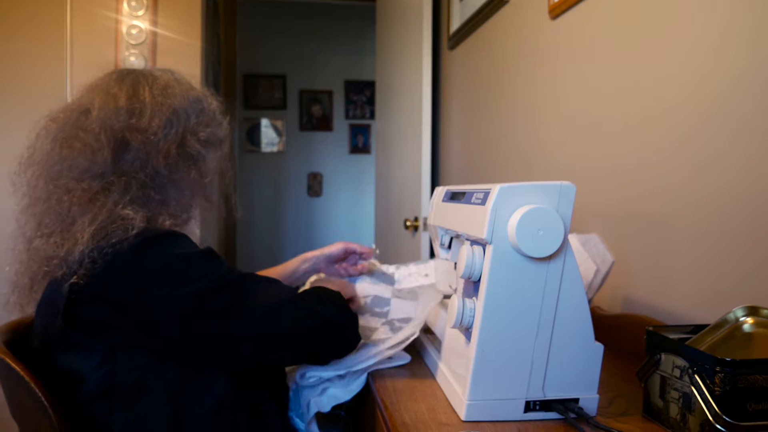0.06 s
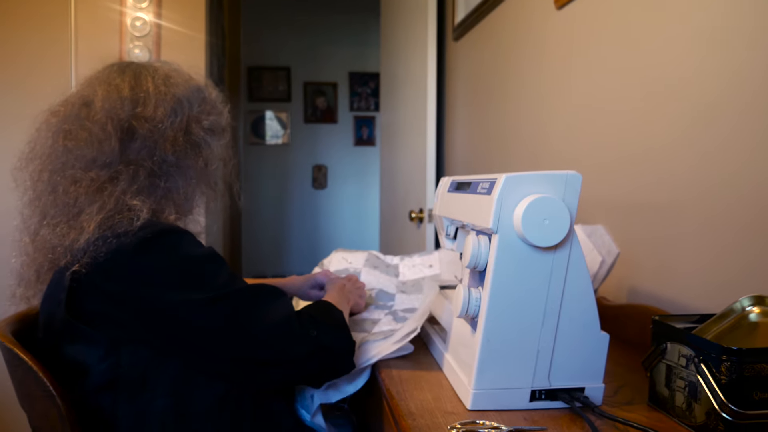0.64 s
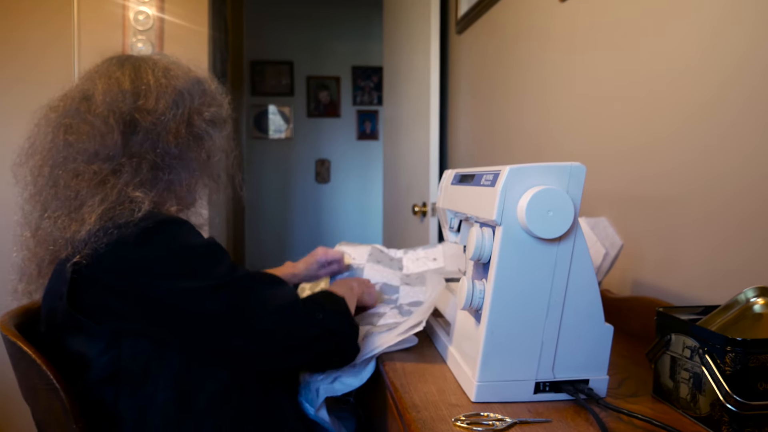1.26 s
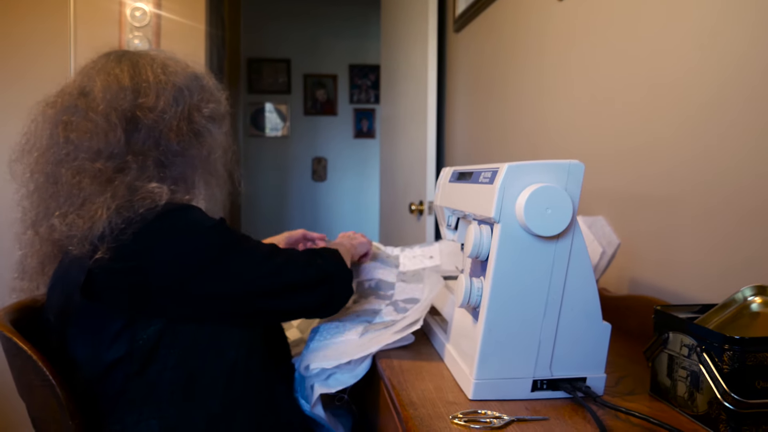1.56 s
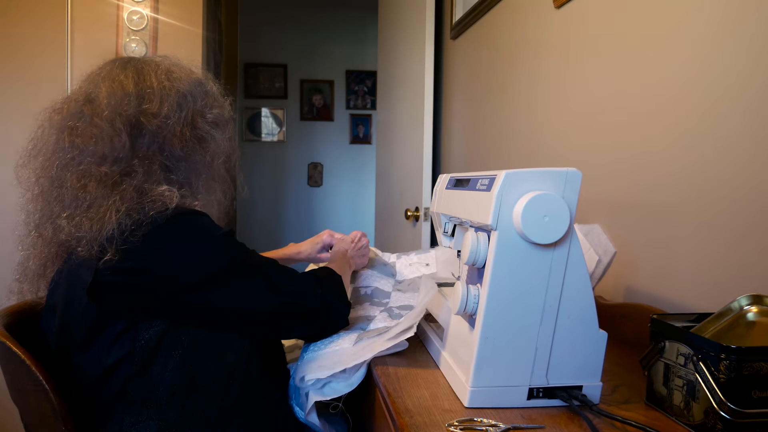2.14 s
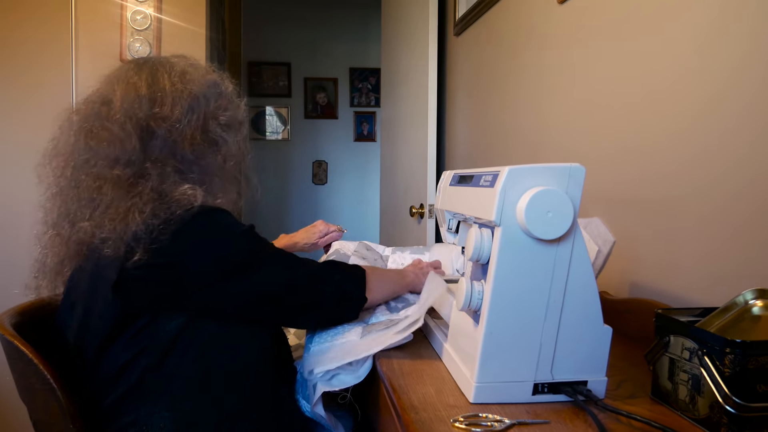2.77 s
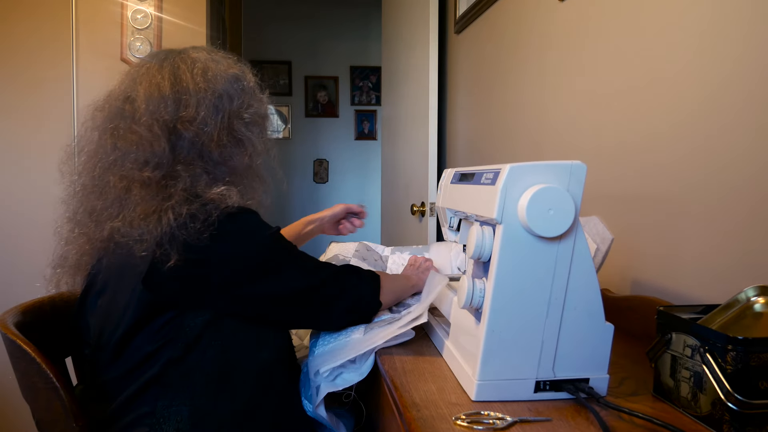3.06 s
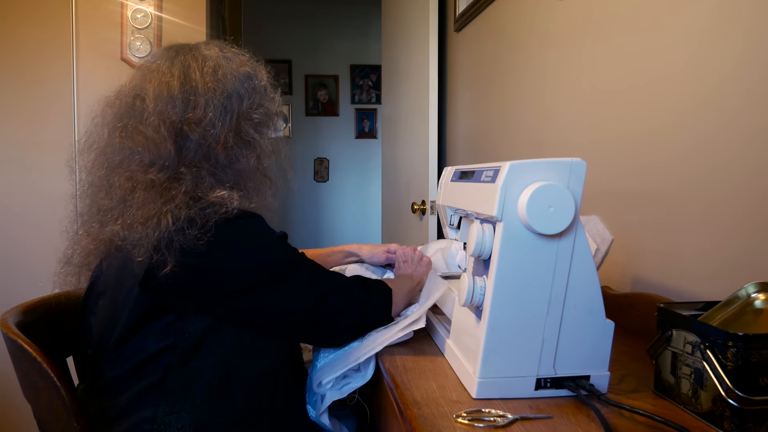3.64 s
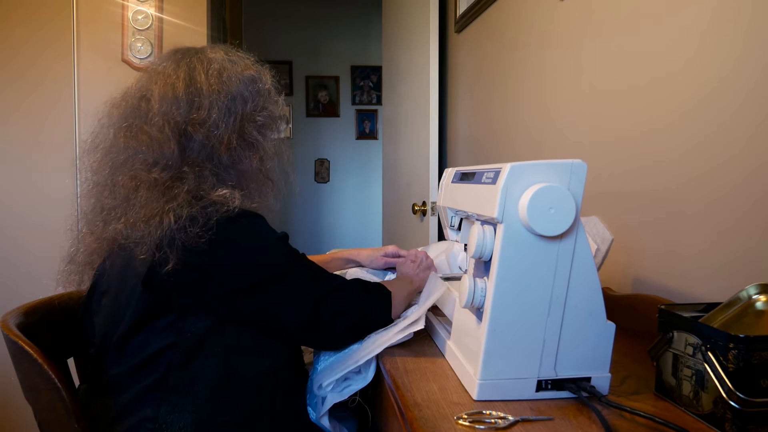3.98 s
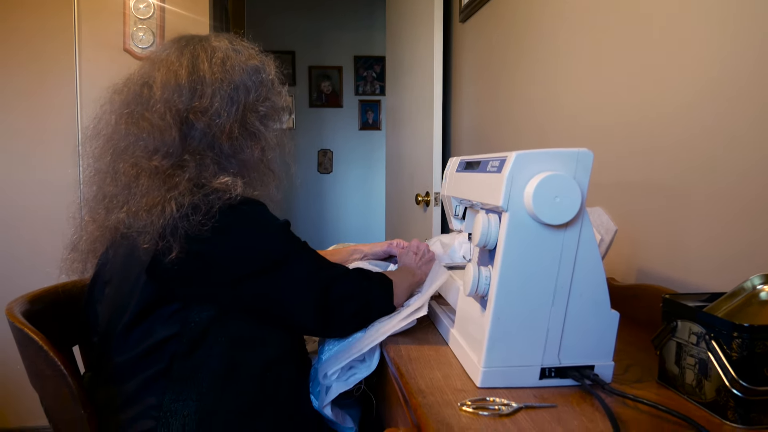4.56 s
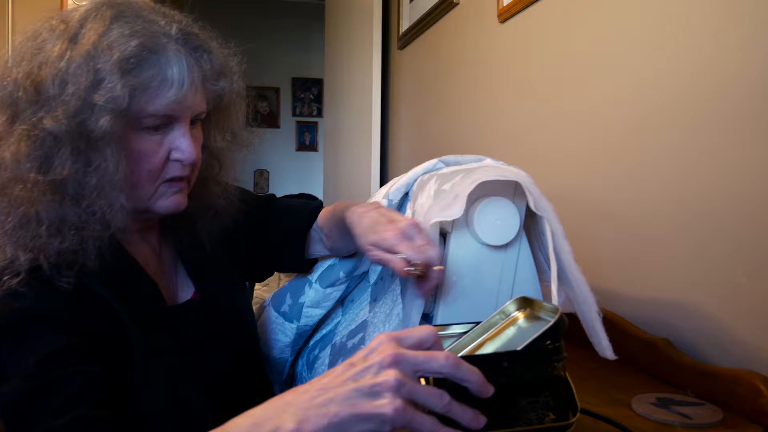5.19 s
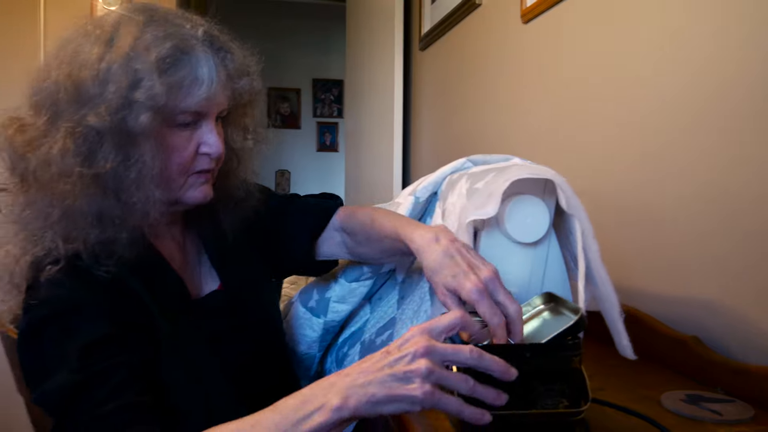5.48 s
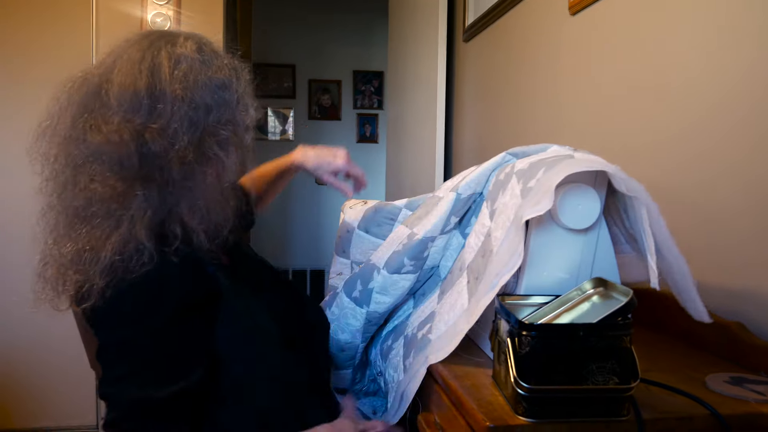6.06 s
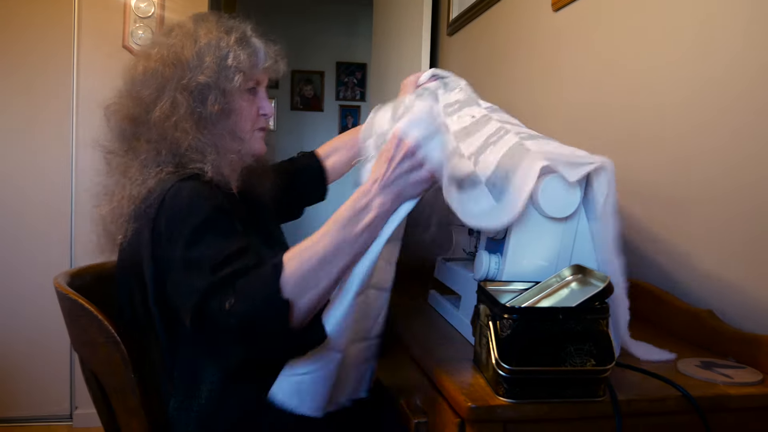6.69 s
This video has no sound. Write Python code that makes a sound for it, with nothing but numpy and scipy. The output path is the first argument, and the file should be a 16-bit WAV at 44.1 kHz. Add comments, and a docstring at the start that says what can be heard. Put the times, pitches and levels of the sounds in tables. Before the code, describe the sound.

In a small, quiet room, nearby hands smooth fabric with faint rubbing, while arms bump a wooden table, furniture creaks and small hard things tick. After about five seconds a tin lid rattles, followed by a loud, ringing clatter as the tin and its contents are pushed along. Last comes a swish of heavy cloth with soft slaps, low thumps and more creaks, all over a faint rumble and hiss.

```python
"""Soft rubbing, a creak and dull thuds: a quilt is handled at a sewing machine in a small, quiet room.
The cloth rustles as its threads stick and slip, arms set the wooden table booming, furniture joints
creak and small hard things click close by. A lid chatters, then a sewing tin is shoved aside with a
loud clatter of contents against ringing steel walls. Last, the quilt is swept up over the machine,
flapping the air and drumming on the table. A low rumble and a faint hiss lie under it all."""
import sys
import numpy as np
from scipy import signal
from scipy.fft import rfft, irfft, next_fast_len
from scipy.io import wavfile
from scipy.ndimage import uniform_filter1d

SR = 44100
rng = np.random.default_rng(int(sys.argv[2]) if len(sys.argv) > 2 else 0)


def transcribe(u):
    """Save the signal u as a 16-bit wav file named by the first command-line argument.

    u: samples, shape (n,) or (channels, n), limited to [-1, 1]; the rate is SR.
    q: integer samples, one column per channel.
    """
    v = np.clip(np.atleast_2d(u).T, -1, 1)
    q = np.round(v * 32767).astype(np.int16)
    wavfile.write(sys.argv[1], SR, q)


N = 305275
TIME = np.arange(N) / SR
AGE = TIME[:SR * 2 // 3]  # seconds since the start of one short event
STROKE_PEAK = 0.37  # share of a stroke at which hand or arm is fastest

# Spectrum of cloth friction. Each row: frequency in Hz, gain in dB.
CLOTH_SPECTRUM = [(530, -4.5), (1020, -6), (1470, -9.5), (1880, -11.5), (3430, -15), (9530, -22),
                  (16000, -34.5)]
# Spectrum of the rattling tin. Each row: frequency in Hz, gain in dB.
TIN_SPECTRUM = [(88, -26), (150, 0.5), (209, -8.5), (321, -7), (439, -3), (504, 1.5), (612, -7), (923, -4),
                (1420, -5.5), (1560, -5.5), (1760, -11), (1940, -7), (2980, -10.5), (6260, -9),
                (16000, -25.5)]
# The tin's base bumping on the table. Each row: start in seconds, relative level in dB.
TIN_BUMPS = [(5.354, -27.5), (5.399, -29), (5.542, -20)]


def cloth(resting_db=-77, flap_db=-2, drum_db=-6, tick_db=-21):
    """Stick-slip friction: threads rustle with speed; the swung quilt flaps air and drums the table."""
    # A hand smooths the cloth. Each row: start and length in seconds, level in dB.
    strokes = [(0.278, 0.52, -83), (1.244, 0.15, -73.5), (1.43, 0.36, -73.5), (2.528, 0.96, -71),
               (3.274, 0.39, -73), (3.58, 0.26, -79.5), (4.136, 0.21, -76.5), (4.758, 0.037, -64),
               (4.9, 0.16, -75)]
    # The quilt is swung up. Each row: start and length in seconds, sliding and air drive in dB.
    swings = [(5.932, 0.62, -57, -50), (6.394, 0.4, -56.5, -43.5), (6.653, 0.38, -62, -56)]
    # Spectra of nails ticking over seams and of flapped air. Each row: frequency in Hz, gain in dB.
    nail_spectrum = [(400, 10), (1500, -36), (6000, -1), (15000, 7)]
    flap_spectrum = [(120, -25), (200, 9.5), (323, -7.5), (542, -9), (1000, -28), (2200, -82)]
    stroking = sum(undb(db) * gesture(s, length, STROKE_PEAK, power=0.74) for s, length, db in strokes)
    hands = undb(resting_db) + stroking  # cloth stirs even under resting hands
    speed, air = hands, 0
    for s, length, slide_db, air_db in swings:
        swing = gesture(s, length, peak=0.42, power=1.43)
        speed = speed + undb(slide_db) * swing
        air = air + undb(air_db) * swing
    folds = undb(3.3 * walk(rate=50))  # moving folds make the level uneven
    slips = unit(colour(grains(N, rate=9000, spread_db=0), CLOTH_SPECTRUM)) * speed
    ticks = unit(colour(grains(N, rate=30, spread_db=-9), nail_spectrum)) * hands * undb(tick_db)
    flaps = unit(colour(rng.standard_normal(N), flap_spectrum)) * air * undb(flap_db)
    patter = grains(N, rate=370, spread_db=3.5)
    drumming = unit(signal.fftconvolve(patter, table_blow())[:N]) * air * undb(drum_db)
    return in_room(folds * (slips + flaps) + ticks, wet_db=-15, treble_db=3) + drumming


def crinkles(broadband_db=-10):
    """Buckling: a fold gives way in a run of sharp catches; the tighter the fold, the higher it sounds."""
    # Each row: start and length in seconds, level in dB, pitch in Hz.
    folds = [(1.268, 0.036, -61, 2100), (2.851, 0.047, -61, 2500), (3.018, 0.042, -59.5, 2280),
             (3.612, 0.027, -61, 3700), (6.061, 0.028, -48, 4430), (6.096, 0.024, -47, 2580),
             (6.271, 0.056, -51, 2280), (6.338, 0.016, -52.5, 2200), (6.609, 0.036, -47.5, 2460),
             (6.884, 0.017, -50, 4080)]
    out = np.zeros(N)
    for s, length, db, hz in folds:
        catches = colour(grains(len(AGE), rate=1800, spread_db=2), CLOTH_SPECTRUM)
        pitched = resonate(catches, hz, q=1.6) + undb(broadband_db) * catches
        envelope = np.interp(AGE, [0, 0.25 * length, length], [0, 1, 0])
        add(out, s, peak_at(envelope * pitched, db), lag_s=0)
    return in_room(out, wet_db=-3.5, treble_db=2)


def slaps(dull_hz=900):
    """Air displacement: a loose edge of the quilt slaps down and squeezes out a short, hollow puff."""
    # Each row: start in seconds, level in dB, pitch in Hz.
    landings = [(6.51, -51, 606), (6.574, -42, 400), (6.591, -46, 460), (6.614, -38, 554),
                (6.641, -48.5, 520), (6.689, -44, 322)]
    out = np.zeros(N)
    for s, db, hz in landings:
        puff = rng.standard_normal(len(AGE)) * swell(rise_s=0.0017) * fade(t60=0.057)
        hollow = cut(resonate(puff, hz, q=6.2), dull_hz, "low", order=4)
        add(out, s, peak_at(hollow, db), lag_s=0)
    return in_room(out, wet_db=-18, treble_db=6)


def tin(wall_t60=0.26, scrape_db=-0.5):
    """Impact excitation: knocks rattle the contents and ring walls and cavity; the base bumps on wood."""
    # Tin, lid and contents collide. Each row: start in seconds, relative levels of body, edge and
    # ring in dB, pitch of the struck spot in Hz.
    collisions = [(5.353, -22, -44, -42, 680), (5.362, -28, -38, -39, 1490), (5.403, -22, -33, -52, 1000),
                  (5.46, -19, -30, -38, 1240), (5.488, -27, -53, -50, 1210),
                  (5.512, -19.5, -21.5, -25.5, 1070), (5.547, -35, -31.5, -30, 2670),
                  (5.563, -25, -29, -29, 1580), (5.574, -28, -24, -29.5, 4100),
                  (5.595, -35, -28, -40, 4100), (5.662, -27, -25.5, -38, 1970),
                  (5.706, -37, -29.5, -37.5, 920), (5.741, -30.5, -26.5, -46, 3460),
                  (5.784, -37, -34.5, -38.5, 2080), (5.796, -39, -34.5, -38, 1140),
                  (5.866, -40.5, -44.5, -56, 6460), (5.917, -40.5, -40.5, -50, 1320)]
    # Modes of the thin steel walls. Each row: frequency in Hz, relative level in dB.
    wall_modes = [(921, -51), (1052, -52), (1110, -51), (1206, -51), (1497, -51), (1567, -51), (1886, -54),
                  (1960, -55), (2030, -53), (2606, -55), (3031, -55), (3359, -56), (4129, -54), (4920, -57),
                  (5507, -56), (5835, -55), (6460, -54), (7854, -57)]
    # Modes of the cavity and of the base. Each row: frequency in Hz, relative level in dB, T60 in seconds.
    cavity_modes = [(503.5, -1, 0.24), (549, -9, 0.14)]
    base_modes = [(276, 2, 0.093), (321.6, 8.5, 0.095), (357, -23, 0.054), (527, -2, 0.17)]
    walls = [(hz, db, wall_t60) for hz, db in wall_modes]
    out = scrape(walls) * undb(scrape_db)
    for s, body_db, edge_db, ring_db, hz in collisions:
        envelope = 0.8 * fade(t60=0.012) + fade(t60=0.12)  # a crack, then the longer rattle
        rattle = grains(len(AGE), rate=5800, spread_db=0.5) * envelope
        rattle = colour(rattle + undb(1) * resonate(rattle, hz, q=5), TIN_SPECTRUM)
        steel = peak_at(ring(walls, scatter_db=3, detune=0.001), 0)
        cavity = ring(cavity_modes, scatter_db=1.5, detune=0.015)
        knock = contact(rattle, body_db - 4, edge_db - 1, body_hz=2180, edge_hz=1900)
        add(out, s, knock + undb(ring_db - 2) * (steel + cavity))
    for s, db in TIN_BUMPS:
        base = soften(ring(base_modes, scatter_db=2, detune=0.005), push_s=0.00027)
        add(out, s, peak_at(cut(base, 170, "high"), db))
    return in_room(out, wet_db=-10.5, treble_db=4.5)


def scrape(walls, start_s=5.345, length_s=0.56, steel_db=-10, split_hz=2450):
    """Forced vibration: the shoved tin judders, its contents slide later, and both drive the walls."""
    jostle = grains(N, rate=2200, spread_db=1.5)
    steel = signal.fftconvolve(jostle, ring(walls, scatter_db=1.5, detune=0))[:N]
    sound = unit(colour(jostle, TIN_SPECTRUM)) + undb(steel_db) * unit(steel)
    judder = unit(cut(sound, split_hz, "low", order=4))
    contents = unit(cut(sound, split_hz, "high", order=4))
    early = undb(-34.5) * gesture(start_s, length_s, peak=0.097, power=1.35)
    late = undb(-39.5) * gesture(start_s, length_s, peak=0.64, power=1.26)
    return early * judder + late * contents


def lid(plate_db=-1, rim_db=-3, mode_t60=0.031):
    """Plate vibration: the loose lid chatters on the tin's rim at each rebound and rings briefly."""
    # Each row: start in seconds, relative level in dB, T60 of the chatter in seconds.
    rebounds = [(4.963, -53, 0.22), (5.041, -40.5, 0.1), (5.051, -39.5, 0.086), (5.066, -46, 0.076),
                (5.09, -46, 0.084), (5.127, -52.5, 0.063)]
    # Modes of the lid and spectrum of its chatter. Each row: frequency in Hz, gain in dB.
    lid_modes = [(673, 0.5), (915, -8), (1055, 8.5), (1165, 3), (1580, 0), (1650, 4.5), (1985, 4),
                 (2335, 2), (2435, -12), (3660, -7)]
    rim_spectrum = [(200, -17), (550, 4), (2400, 0.5), (7000, -22.5), (16000, -71)]
    out = np.zeros(N)
    response = ring([(hz, db, mode_t60) for hz, db in lid_modes], scatter_db=1, detune=0)
    for s, db, t60 in rebounds:
        chatter = grains(len(AGE), rate=8900, spread_db=0) * fade(t60)
        plate = peak_at(signal.fftconvolve(chatter, response)[:len(AGE)], db + plate_db)
        rim = peak_at(colour(chatter, rim_spectrum), db + rim_db)
        add(out, s, plate + rim, lag_s=0.0012)
    return in_room(out, wet_db=-7, treble_db=-0.5)


def thuds(deep_hz=108, settle_s=0.042, settle_db=-7.5, tin_db=-16):
    """Modal response: arms, quilt and tin set the table booming; its deepest mode lies below deep_hz."""
    # An arm or heavy fold lands. Each row: start in seconds, relative levels of boom and deep mode in dB.
    landings = [(0.191, -32.5, -62), (0.262, -40.5, -38.5), (1.102, -48, -40.5), (1.674, -39, -78),
                (2.861, -36, -38.5), (3.027, -36, -40), (3.101, -36.5, -42.5), (3.246, -47, -52),
                (3.414, -43.5, -67), (5.989, -39.5, -40.5), (6.062, -47, -33), (6.163, -32, -58),
                (6.219, -35.5, -46), (6.265, -30.5, -56), (6.474, -32.5, -39), (6.574, -22, -36),
                (6.615, -30.5, -21.5), (6.689, -31.5, -46), (6.823, -32.5, -42)]
    out = np.zeros(N)
    for s, boom_db, deep_db in landings:
        for lag_s, drop_db in [(0, 0), (settle_s, settle_db)]:  # the weight settles with a softer blow
            blow = contact(table_blow(), deep_db - 4.5, boom_db - 2.5, body_hz=deep_hz, edge_hz=deep_hz)
            add(out, s, undb(drop_db) * blow, lag_s)
    for s, db in TIN_BUMPS:
        add(out, s, peak_at(table_blow(), db + tin_db))
    return out


def table_blow(lowest_hz=60):
    """Free vibration: the table top's modes die away after one soft blow."""
    # Each row: frequency in Hz, relative level in dB, T60 in seconds.
    table_modes = [(86.2, 0, 0.41), (132.5, 4.5, 0.33), (169.1, 5, 0.12), (224, -18, 0.8),
                   (259, -12, 0.098), (378, -10.5, 0.078), (530, -16, 0.11)]
    boom = ring(table_modes, scatter_db=3, detune=0.02)
    return cut(soften(boom, push_s=0.00087), lowest_hz, "high", order=4)


def creaks():
    """Stick-slip motion: a joint of chair or table snaps free, and a run of slips dies away in the wood."""
    # Each row: start in seconds, relative levels of body and edge in dB, hold of the run in seconds,
    # first snap against the slips in dB, pitch in Hz.
    joints = [(0.1853, -49, -55.5, 0.0095, 29, 1190), (0.257, -40, -46.5, 0.01, 25, 1160),
              (1.672, -51.5, -58.5, 0, 18.5, 1400), (1.712, -44, -46.5, 0, 23, 1910),
              (6.111, -38, -45, 0.038, 18, 1700), (6.166, -38.5, -45, 0.0074, 16, 1930),
              (6.726, -40, -50.5, 0.007, 28, 1780), (6.757, -39.5, -50, 0, 7, 1770),
              (6.8095, -36.5, -44.5, 0.021, 17, 1620), (6.916, -39.5, -45, 0, 21, 1580)]
    # Response of the wood. Each row: frequency in Hz, gain in dB.
    wood_spectrum = [(210, -39), (350, -3.5), (1120, -2.5), (1600, -4), (2670, -6), (3670, -7), (6230, -11),
                     (12000, -27), (14500, -34), (16000, -68)]
    out = np.zeros(N)
    for s, body_db, edge_db, hold_s, snap_db, hz in joints:
        run = fade(t60=0.057, hold_s=hold_s) + 1.14 * fade(t60=0.22, hold_s=hold_s)
        slips = grains(len(AGE), rate=13000, spread_db=2.5) * run * swell(rise_s=0.00087)
        force = slips + undb(snap_db) * signal.unit_impulse(len(AGE))
        joint = force + undb(-1) * resonate(force, hz, q=4)
        wood = colour(joint, tinted(wood_spectrum, spread_db=1.5))
        add(out, s, contact(wood, body_db - 3, edge_db - 1, body_hz=2600, edge_hz=2800), lag_s=0.00113)
    return in_room(out, wet_db=-10, treble_db=1)


def clicks():
    """Hard impact: a brief contact gives a broadband tick, and the touched part rings for milliseconds."""
    # Each row: start in seconds, relative levels of body, edge and ring in dB, pitch of the ring in Hz.
    touches = [(0.136, -63, -60.5, -68, 3000), (1.1017, -37, -63, -53, 4020),
               (1.1068, -38, -42.5, -37.5, 2250), (1.36, -49.5, -54.5, -57, 3500),
               (1.573, -88, -46, -73, 3400), (2.3434, -43, -44.5, -49.5, 8850),
               (2.366, -46, -52, -51, 7260), (2.3714, -28, -35, -31, 1360), (2.715, -39, -51.5, -58, 1110),
               (2.905, -45, -61, -59, 2400), (4.468, -82, -61.5, -69, 4600), (4.528, -78, -53, -55.5, 6260),
               (4.572, -43, -51, -43.5, 1400), (4.776, -53, -80, -66, 1360),
               (5.5114, -37, -21.5, -22.5, 1900), (6.233, -36, -59, -47, 2610)]
    # Each row: frequency in Hz, gain in dB.
    tick_spectrum = [(71, -28), (120, -7.5), (330, 1), (700, -9), (1350, -7), (2300, -16.5), (9500, -34),
                     (16000, -46)]
    out = np.zeros(N)
    for s, body_db, edge_db, ring_db, hz in touches:
        force = signal.unit_impulse(len(AGE)) + 0.14 * rng.standard_normal(len(AGE)) * fade(t60=0.012)
        tick = contact(colour(force, tick_spectrum), body_db - 1, edge_db - 1, body_hz=2180, edge_hz=2830)
        part = np.sin(2 * np.pi * hz * AGE) * fade(t60=0.007)
        add(out, s, tick + peak_at(part, ring_db))
    return in_room(out, wet_db=-6.5, treble_db=-2.5, t60=0.25, treble_t60=0.22)


def knocks(mode_t60=0.13):
    """Shell resonance: the machine's hollow casing answers a finger with a short, low note."""
    # Each row: start in seconds, level in dB.
    taps = [(1.108, -45), (1.712, -49), (2.372, -37)]
    casing = [(hz, db, mode_t60) for hz, db in [(261, 5), (389, -8), (452, -7), (540, -11)]]
    out = np.zeros(N)
    for s, db in taps:
        add(out, s, peak_at(ring(casing, scatter_db=2, detune=0), db))
    return out


def pins(gain_db=-10):
    """Narrow resonance: a tick and a faint shimmer high in the treble, as of pins touching."""
    # Each row: start in seconds, pitch in Hz, relative level in dB.
    pings = [(0.4239, 15100, -45), (1.7978, 15100, -52), (2.7157, 15100, -44), (3.3278, 15100, -53),
             (4.572, 9200, -49), (6.2345, 15100, -41)]
    out = np.zeros(N)
    for s, hz, db in pings:
        touch = rng.standard_normal(len(AGE)) * (fade(t60=0.008) + 0.22 * fade(t60=0.15))
        add(out, s, peak_at(resonate(touch, hz, q=20), db + gain_db))
    return out


def sleeve():
    """Sliding friction: a sleeve on the table edge gives a dull, grainy rub that follows the arm's speed."""
    # Each row: start and length in seconds, level in dB.
    rubs = [(0.092, 0.3, -60), (0.376, 0.11, -65), (4.887, 0.089, -64)]
    # Each row: frequency in Hz, gain in dB.
    rub_spectrum = [(200, -34), (420, -7.5), (520, -11), (800, -45), (3000, -48)]
    speed = sum(undb(db) * gesture(s, length, STROKE_PEAK, power=1) for s, length, db in rubs)
    return unit(colour(grains(N, rate=3700, spread_db=4), rub_spectrum)) * speed


def room_tone(rumble_db=-54.5, hiss_db=-70, waver_db=0.5):
    """Ambient noise: the low rumble of the house and a faint hiss waver slightly in level."""
    # Each row: frequency in Hz, gain in dB.
    rumble_spectrum = [(8.8, -33.5), (15, 4), (38, -15), (54, -8.5), (81, -18), (113, -14), (135, -24.5),
                       (172, -21.5), (260, -54), (440, -120)]
    hiss_spectrum = [(120, -48.5), (200, -3), (299, -3.5), (353, -11.5), (473, -11.5), (791, -19),
                     (7970, -36), (16000, -37)]
    rumble = unit(colour(rng.standard_normal(N), rumble_spectrum)) * undb(rumble_db)
    hiss = unit(colour(rng.standard_normal(N), hiss_spectrum)) * undb(hiss_db)
    return (rumble + hiss) * undb(waver_db * walk(rate=2.84))


def in_room(x, wet_db, treble_db, t60=0.4, treble_t60=0.29, split_hz=2200):
    """Reverberation: the small room adds a diffuse tail whose treble dies first."""
    noise = rng.standard_normal(len(AGE))
    bass = cut(noise, split_hz, "low", order=3) * fade(t60)
    treble = undb(treble_db) * cut(noise, split_hz, "high", order=3) * fade(treble_t60)
    tail = (bass + treble) * swell(rise_s=0.0011) / np.linalg.norm(noise * fade(t60))
    return x + undb(wet_db) * signal.fftconvolve(x, tail)[:N]


def gesture(start, length, peak, power):
    """Speed of one movement: from rest up to 1 at the share `peak` of its length, and back to rest."""
    phase = np.interp(TIME, start + length * np.array([0, peak, 1]), [0, 0.5, 1])
    return np.sin(np.pi * phase) ** power * (phase > 0) * (phase < 1)


def grains(n, rate, spread_db):
    """Shot noise: `rate` tiny impacts a second on average, of random size, at rms 1."""
    sizes = undb(spread_db * np.minimum(rng.exponential(size=n), 5)) * rng.standard_normal(n)
    return unit(sizes * (rng.random(n) < rate / SR))


def ring(modes, scatter_db, detune):
    """Damped modes: the spot and grip of each blow weight and shift them at random."""
    chance = rng.standard_normal((len(modes), 2))
    return sum(undb(db + scatter_db * weight) * np.sin(2 * np.pi * hz * (1 + detune * shift) * AGE)
               * fade(t60) for (hz, db, t60), (weight, shift) in zip(modes, chance))


def contact(x, body_db, edge_db, body_hz, edge_hz):
    """Contact hardness: a harder blow has more edge (high band) against its body (low band)."""
    body = peak_at(cut(x, body_hz, "low", order=4), body_db)
    edge = peak_at(cut(x, edge_hz, "high", order=4), edge_db)
    return body + edge


def soften(x, push_s):
    """Contact time: a soft blow pushes for a while, which weakens the treble."""
    return signal.lfilter([1], [1, -np.exp(-1 / (push_s * SR))], x)


def tinted(points, spread_db, count=36):
    """Random ripple on a spectrum: each struck spot has resonances of its own."""
    hz, db = np.transpose(points)
    grid = np.geomspace(hz[0], hz[-1], count)
    smooth_db = np.interp(np.log(grid), np.log(hz), db)
    return np.column_stack([grid, smooth_db + spread_db * rng.standard_normal(count)])


def colour(x, points):
    """Causal (minimum-phase) filter through (Hz, dB) points."""
    n = 2 * next_fast_len(len(x))
    hz, db = np.transpose(points)
    gain = undb(np.interp(np.log(np.fft.rfftfreq(n, 1 / SR) + 1), np.log(hz), db))
    cepstrum = irfft(np.log(gain))
    cepstrum[1:n // 2] *= 2  # fold onto positive time
    cepstrum[n // 2 + 1:] = 0
    return irfft(rfft(x, n) * np.exp(rfft(cepstrum)), n)[:len(x)]


def cut(x, hz, kind, order=2):
    """Low-pass or high-pass filter."""
    return signal.sosfilt(signal.butter(order, hz, kind, fs=SR, output="sos"), x)


def resonate(x, hz, q):
    """One resonance, gain 1 at its centre."""
    return signal.lfilter(*signal.iirpeak(hz, q, SR), x)


def fade(t60, hold_s=0):
    """Exponential decay, 60 dB in t60 seconds, after an optional hold."""
    return np.exp(-np.log(1000) * np.maximum(AGE - hold_s, 0) / t60)


def swell(rise_s):
    """Exponential rise from 0 towards 1."""
    return 1 - np.exp(-AGE / rise_s)


def walk(rate):
    """Random drift through `rate` values a second, with a spread near 1."""
    step = int(SR / rate)
    return uniform_filter1d(np.repeat(rng.standard_normal(N // step + 1), step), step)[:N]


def undb(db):
    """Decibels to gain."""
    return 10 ** (np.asarray(db) / 20)


def unit(x):
    """Scale to rms 1."""
    return x / np.sqrt(np.mean(x ** 2))


def peak_at(x, db, size=220):
    """Scale a hit so that its loudest few milliseconds have this rms level."""
    return x * undb(db) / np.sqrt(uniform_filter1d(x ** 2, size).max())


def add(out, s, sound, lag_s=0.0018):
    """Mix in a sound that starts lag_s after time s."""
    start = int((s + lag_s) * SR)
    out[start:start + len(sound)] += sound[:max(N - start, 0)]


def scene():
    """Superposition: all sources sum at one listening point."""
    quilt = cloth() + crinkles() + slaps() + sleeve()
    return (quilt + pins() + clicks() + knocks() + creaks() + thuds() + lid() + tin() + room_tone())[None]


def record(dry):
    """Band limiting: a steep low-pass removes the highest treble."""
    top_hz = 16300
    return signal.sosfilt(signal.ellip(10, 0.1, 80, top_hz, fs=SR, output="sos"), dry)


dry = scene()
out = record(dry)
transcribe(out)
```